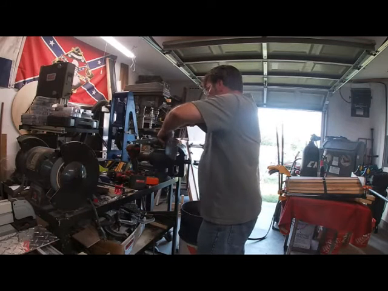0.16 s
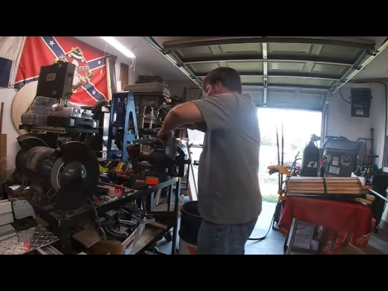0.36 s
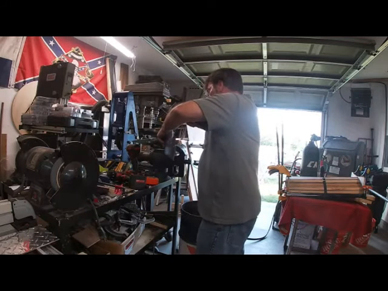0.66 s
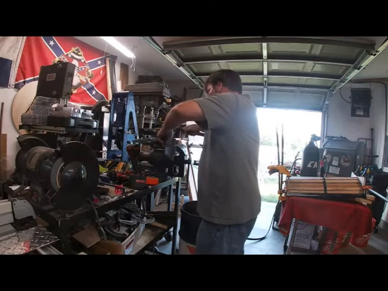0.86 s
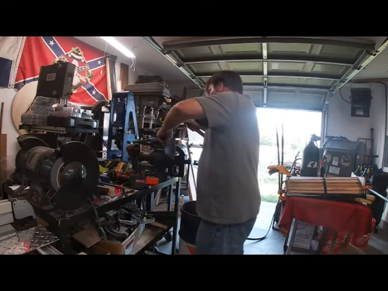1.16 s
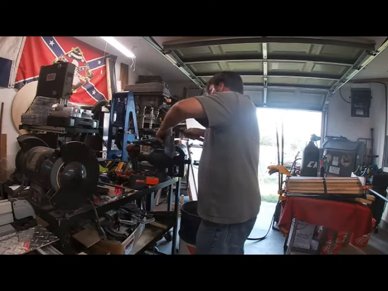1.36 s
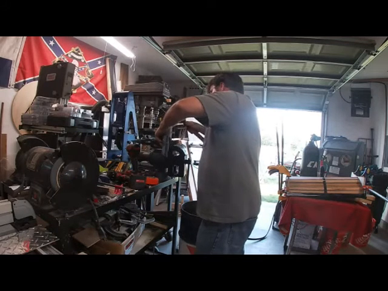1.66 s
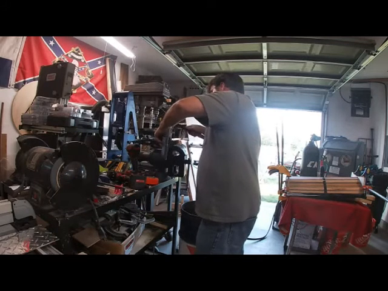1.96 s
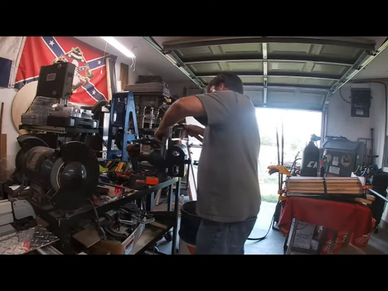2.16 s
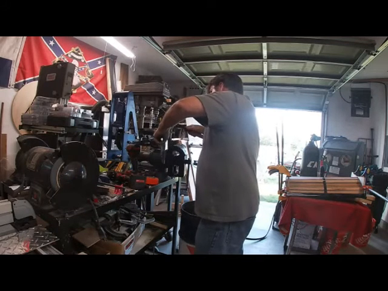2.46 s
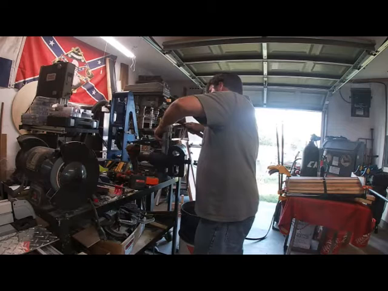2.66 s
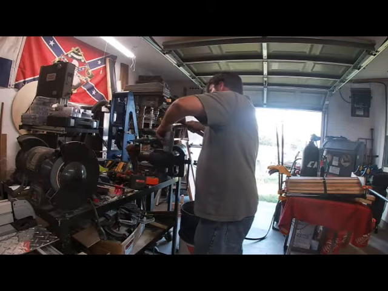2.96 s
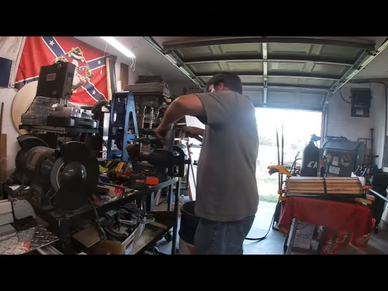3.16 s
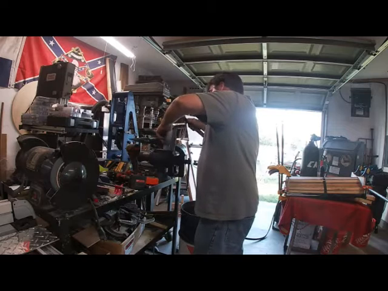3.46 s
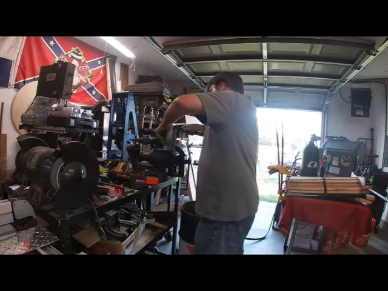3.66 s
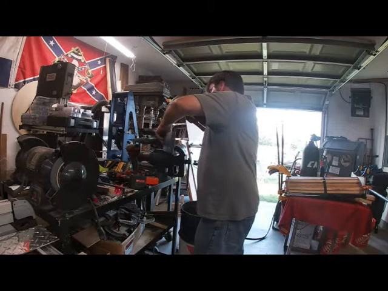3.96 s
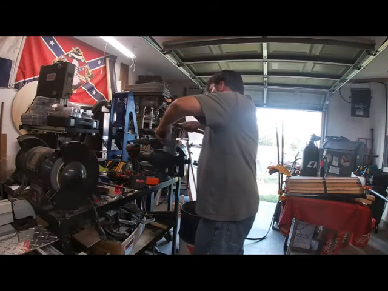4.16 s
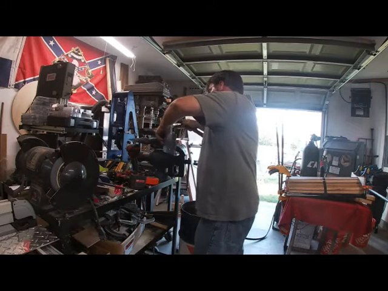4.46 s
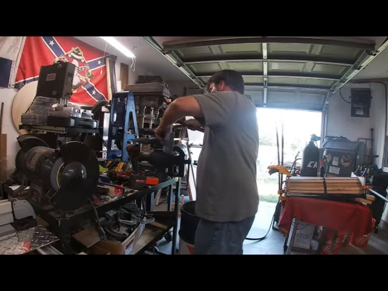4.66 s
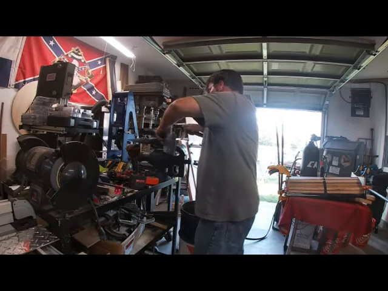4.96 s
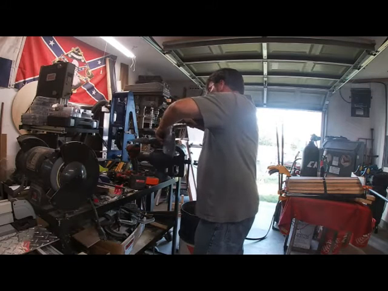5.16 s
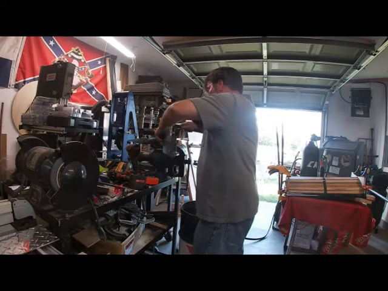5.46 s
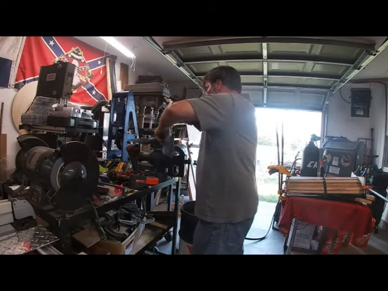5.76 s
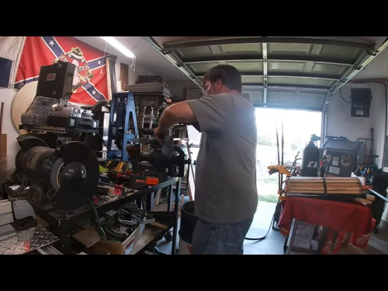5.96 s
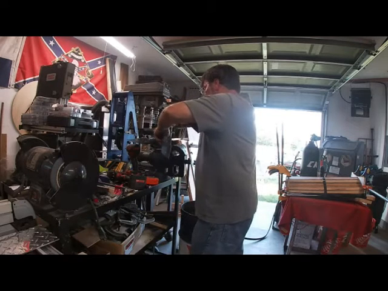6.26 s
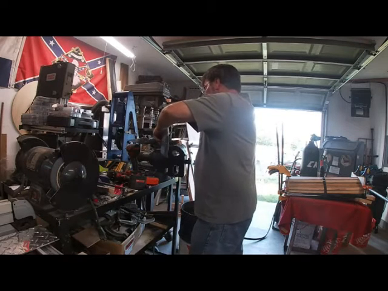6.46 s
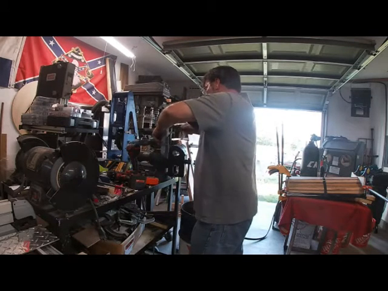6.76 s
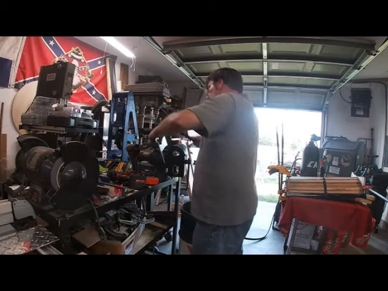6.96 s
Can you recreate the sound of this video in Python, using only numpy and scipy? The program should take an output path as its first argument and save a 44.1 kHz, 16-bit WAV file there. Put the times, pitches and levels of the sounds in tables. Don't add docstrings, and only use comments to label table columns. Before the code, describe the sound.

A hammer steadily peens a metal rivet on a steel block, sixteen sharp clanking knocks with woody thud and garage echo, over faint traffic hum.

```python
import sys
import numpy as np
from scipy import signal
from scipy.fft import rfft, irfft
from scipy.io import wavfile
from scipy.ndimage import uniform_filter1d

SR = 44100
rng = np.random.default_rng(int(sys.argv[2]) if len(sys.argv) > 2 else 0)


def voltage_ratio(decibels):
    exponent = np.asarray(decibels, float) / 20
    return 10 ** exponent


def put_to_file(sound):
    columns = np.atleast_2d(sound).T
    safe = np.clip(columns, -1, 1)
    whole_steps = np.round(safe * 32767)
    wavfile.write(sys.argv[1], SR, whole_steps.astype(np.int16))


N = 313110

# [t/s, bench force level/dB, squareness on block/dB, steel ring level/dB, top fizz level/dB]
BLOWS = [(0.0879, -17, -3, 4, 4), (0.5328, -16, -5.5, 2.5, 3.5), (0.9844, -16, 5.5, 3, 0.5),
         (1.4371, -16, -2, 0.5, -1), (1.883, -16.5, 2.5, 1.5, 2.5), (2.3497, -20, 10.5, 12, 8.5),
         (2.8568, -16, 2.5, 0.5, 0), (3.3106, -14, 6.5, -0.5, -4.5), (3.775, -14, 5.5, -0.5, 4.5),
         (4.2258, -14, 4.5, 3, 2.5), (4.65, -13.5, 10.5, -6, -13), (5.1026, -15, 6.5, -5, -2.5),
         (5.5422, -16, 5.5, -5, 1), (5.9764, -16.5, 4.5, -5, 0.5), (6.3966, -16, 3, -4.5, -2),
         (6.8231, -14, 2.5, -7, -4)]
BLOW_S, FORCE_DB, SQUARE_DB, RING_REL_DB, FIZZ_REL_DB = np.transpose(BLOWS)
# [f/Hz, level/dB, t60/s]
WOOD_MODES = [(137.7, -8.5, 0.61), (161, -7.5, 0.15), (189.8, 3.5, 0.097), (200.9, -4, 0.23),
              (213.6, -7.5, 0.97), (255, -50, 0.28), (298, 3, 0.2), (326, -11.5, 0.13), (366, -3.5, 0.41),
              (421.2, -39.5, .25),
              (383, -38, 0.091), (537.4, -19.5, 0.76), (591, -15, 0.48), (600, 4, 0.18), (663, -1, 0.045),
               (739, -9.5, 0.35), (884, -11.5, 0.093), (937, -2.5, 0.068), (1108, -16, .25),
               (1143, -15.5, 0.45), (1218, -5.5, 0.23), (1378, -32, 0.099)]
# [f/Hz, level/dB, t60/s]
STEEL_MODES = [(2790, -15, 0.0072), (3340, -5, 0.013), (4460, -11, 0.016), (4930, -4, .03), (5195, -3, .03),
               (5525, 4, 0.015), (5605, 2.5, .03), (5870, -4, .03), (6900, -16.5, .02), (7800, -19, 0.017),
               (8270, -12, .02), (8850, -6, .02), (9380, -10, 0.011), (10130, -8.5, 0.0074)]
# [f/Hz, level/dB, t60/s]
CLANK_MODES = [
    (2057, -18.5, 0.01),
    (2058, -0.5, 0.034),
    (2306, -4, 0.025),
]
# [t after push/s, level/dB]
ECHOES = [
    (0, 3.5),
    (.0064, -1),
    (0.0291, -4),
    (.049, -8),
    (.068, -5),
]
# [f/Hz, level/dB per Hz]
GARAGE_COLOUR = [(59, -40), (100, 1.5), (301, 2), (422, -21.5), (568, -7), (780, -15), (1120, -13),
                 (4250, -30), (5720, -29), (7060, -37.5), (10300, -39.5), (14200, -47), (15800, -66)]
# [f/Hz, t60/s]
GARAGE_T60 = [(100, 0.72), (260, 0.25), (700, 0.38), (1840, 0.36), (4850, 0.33), (12800, 0.21)]
# [f/Hz, level/dB per Hz]
RUMBLE = [(15, -18), (26, 3.5), (32, -2.5), (39, -4.5), (52, 2), (62, 4), (77, 6.5), (99, -7.5), (125, 1.5),
          (200, -3.5), (260, -7), (370, -10), (450, -22)]
# [f/Hz, level/dB per Hz]
ROAD = [(240, -26), (400, 3.5), (461, 0), (640, 3), (1210, -7), (1420, -10), (2210, -14), (4010, -22.5),
        (5560, -23), (7190, -46.5), (12000, -47.5), (15600, -74.5), (22000, -120)]
# [t/s, tyre hiss level/dB]
TRAFFIC = [
    (0, -45.5),
    (1.2, -46),
    (2.8, -43.5),
    (3.5, -45.5),
    (4.4, -48),
    (5.57, -54.5),
    (6.8, -54),
    (7.1, -66),
]
AHEAD_HZ = [1300, 2150, 3550, 5050, 5600, 8800, 9900, 11000]

PUSH_LAG_S, PUSH_S = 0.00054, 0.0042
TICK_DB, TICK_YIELDS = 10, 0.6
RING_DB, FIZZ_DB = -7.5, -11.5
DULLING_DB_PER_S = 0.82
PLATEAU_S = 0.045
FAN_DB, ENGINE_DB = -35, 10.5
CYCLE_S, WORST_PHASE, AHEAD_DB_MEAN, AHEAD_DB_SWING = 0.015564, 0.48, -7, 4.4


def tick():
    dying = np.exp(-np.arange(600) / SR / 0.0017)
    levels_db = FORCE_DB + TICK_DB - TICK_YIELDS * SQUARE_DB - 2.0
    return band(rng.standard_normal(N) * after_blow(levels_db, dying), 1400, 7300)


def push():
    pulse = np.sin(np.pi * np.clip(np.arange(300) / SR / PUSH_S, 0, 1))
    return voltage_ratio(-0.5) * convolve(arrivals(FORCE_DB), pulse)


def arrivals(levels_db):
    return sum(train(levels_db + db, PUSH_LAG_S + s) for s, db in ECHOES)


def struck(modes, level_db, spread_db, drive):
    luck = np.clip(rng.standard_normal((len(BLOWS), len(modes))), -1.5, 1.5)
    out = np.zeros(N)
    for k, (hz, db, t60_s) in enumerate(modes):
        sign = (-1) ** k if hz > 400 else 1
        levels_db = strength(hz) + db + level_db + spread_db * luck[:, k]
        out += sign * ring(drive(levels_db), hz, t60_s)
    return out


def metal(knock_wet_db=-39, wet_db=-26, t60_s=0.32):
    scatter = rng.standard_normal(N)

    def scattered(levels_db, share_db=wet_db):
        return train(levels_db) + scatter * after_blow(levels_db + share_db, fading(t60_s))

    knock = np.zeros(N)
    for hz, db, mode_t60_s in CLANK_MODES:
        levels_db = FORCE_DB + SQUARE_DB + db - 2.5
        knock += ring(scattered(levels_db, knock_wet_db), hz, mode_t60_s)
    damped = [(hz, db, min(mode_t60_s, 90 / hz)) for hz, db, mode_t60_s in STEEL_MODES]
    return knock + struck(damped, 1.6, 2.7, scattered)


def strength(hz):
    regions = np.log([350, 900, 5300, 10500])
    levels_db = []
    for s, force_db, square_db, ring_db, fizz_db in BLOWS:
        rel_db = [0, 4.0 - DULLING_DB_PER_S * s, RING_DB + ring_db, FIZZ_DB + fizz_db]
        levels_db.append(force_db + np.interp(np.log(hz), regions, rel_db))
    return np.array(levels_db)


def garage(change=0.44):
    t, out = np.arange(SR // 2) / SR, np.zeros(N)
    edges_hz = 250 * 2 ** np.arange(0, 6.2, 0.4)
    for low_hz, high_hz in zip(edges_hz, edges_hz[1:]):
        hz = np.sqrt(low_hz * high_hz)
        levels_db = strength(hz) - strength(hz).mean() + at_hz(GARAGE_COLOUR, hz) + 6
        build_up = 1 - np.exp(-t / (0.0016 + 2.8 / hz))
        shape = build_up * fading(0.98 * at_hz(GARAGE_T60, hz))
        fixed = after_blow(levels_db, shape * rng.standard_normal(len(t)))
        fresh = after_blow(levels_db, shape) * rng.standard_normal(N)
        out += band(fixed + change * fresh, low_hz, high_hz)
    return out


def fading(t60_s):
    t = np.arange(SR // 2) / SR
    return voltage_ratio(-60 * (np.hypot(t, PLATEAU_S) - PLATEAU_S) / np.clip(t60_s, 0.05, 2))


def outside():
    s, hiss_db = np.transpose(TRAFFIC)
    hiss = voltage_ratio(np.interp(np.arange(N) / SR, s, hiss_db))
    rumble = np.hypot(voltage_ratio(FAN_DB), voltage_ratio(ENGINE_DB) * hiss)
    return rumble * coloured(RUMBLE) + hiss * coloured(ROAD)


def noise_ahead(x, patchy_db=5):
    out, size = np.zeros(N), 1408
    rise = voltage_ratio(-33 * (1 - np.arange(size) / size))
    hz = np.fft.rfftfreq(size, 1 / SR)[:, None]
    luck = rng.standard_normal((len(BLOWS), len(AHEAD_HZ)))
    noise = rng.standard_normal((len(BLOWS), size))
    upper = band(x, 900, 12000)
    bumps = np.exp(-((hz - AHEAD_HZ) / (120 + 0.03 * hz)) ** 2)
    for k, s in enumerate(BLOW_S):
        at = int(s * SR)
        attack = upper[at:at + 512]
        colour = uniform_filter1d(np.abs(rfft(attack, size)) ** 0.75, size=15)
        patches = 0.05 + bumps @ voltage_ratio(patchy_db * luck[k])
        spread = rms_one(irfft(rfft(noise[k]) * colour * patches, size))
        level_db = AHEAD_DB_MEAN + AHEAD_DB_SWING * np.cos(2 * np.pi * (s / CYCLE_S - WORST_PHASE))
        out[at - size:at] = rise * spread * attack.std() * voltage_ratio(level_db)
    return out


def band(x, low_hz, high_hz):
    edges_hz = [low_hz, min(high_hz, 0.45 * SR)]
    return signal.sosfilt(signal.butter(2, edges_hz, "band", fs=SR, output="sos"), x)


def rms_one(x):
    return x / np.sqrt(np.mean(x ** 2) + 1e-20)


def at_hz(points, hz):
    table_hz, values = np.transpose(points)
    return np.interp(np.log(hz), np.log(table_hz), values)


def convolve(x, response):
    return signal.fftconvolve(x, response)[:N]


def train(levels_db, lag_s=0):
    out = np.zeros(N)
    out[((BLOW_S + lag_s) * SR).astype(int)] = voltage_ratio(levels_db)
    return out + 1e-18


def ring(x, hz, t60_s):
    r, w = voltage_ratio(-60 / (t60_s * SR)), 2 * np.pi * hz / SR
    return signal.lfilter([0, np.sin(w)], [1, -2 * r * np.cos(w), r * r], x)


def after_blow(levels_db, shape):
    starts = (BLOW_S * SR).astype(int)
    last = np.maximum(np.searchsorted(starts, np.arange(N), "right") - 1, 0)
    since = np.arange(N) - starts[last]
    return voltage_ratio(levels_db)[last] * shape[np.clip(since, 0, len(shape) - 1)] * (since >= 0)


def coloured(spectrum):
    hz = np.fft.rfftfreq(N, 1 / SR) + 1
    inside = (hz > spectrum[0][0]) & (hz < spectrum[-1][0])
    return rms_one(irfft(rfft(rng.standard_normal(N)) * voltage_ratio(at_hz(spectrum, hz)) * inside, N))


def scene():
    wood = struck(WOOD_MODES, -7.5, 2.63, arrivals)
    blows = tick() + push() + wood + metal() + garage()
    blows = signal.sosfilt(signal.butter(6, 115, "high", fs=SR, output="sos"), blows)
    return np.tile(blows + outside(), (2, 1))


def band_limit(x):
    return signal.sosfilt(signal.butter(12, 16030, fs=SR, output="sos"), x)


def record(dry):
    x = voltage_ratio(-2.0) * dry
    x = 1.8 * np.tanh(x / 1.8)
    top = signal.sosfilt(signal.cheby2(10, 50, 10900, "high", fs=SR, output="sos"), x[0])
    side = voltage_ratio(-1.5) * top * np.sign(band(rng.standard_normal(N), 30, 300))
    x = x + noise_ahead(x[0]) + side * [[1], [-1]]
    x = signal.sosfilt(signal.cheby2(16, 60, 15650, fs=SR, output="sos"), x)
    return band_limit(x)


dry = scene()
out = record(dry)
put_to_file(out)
```